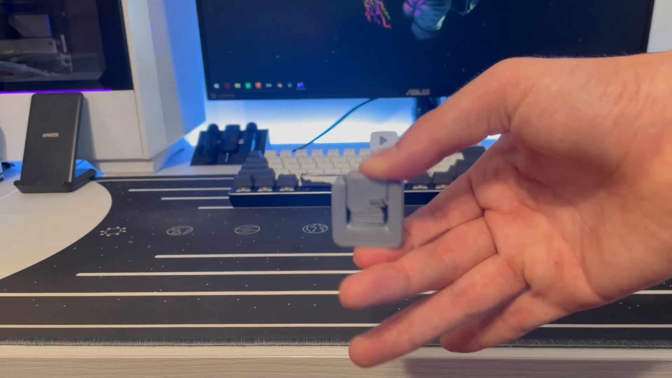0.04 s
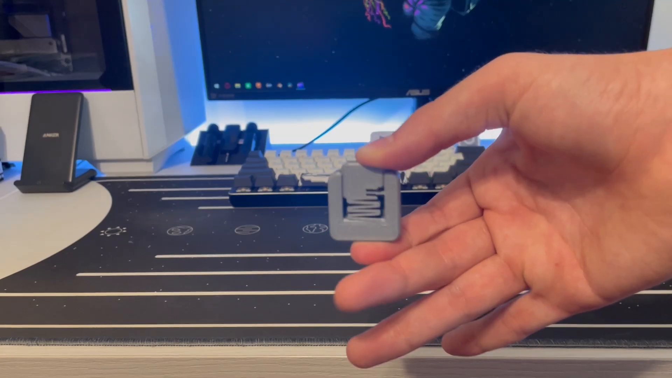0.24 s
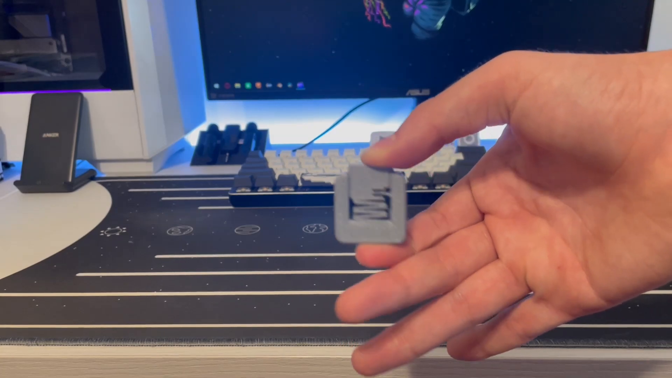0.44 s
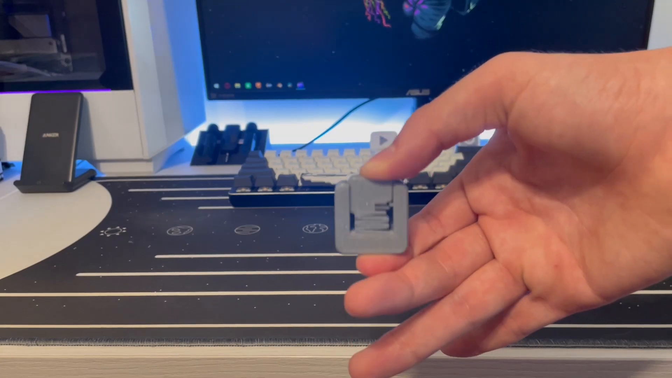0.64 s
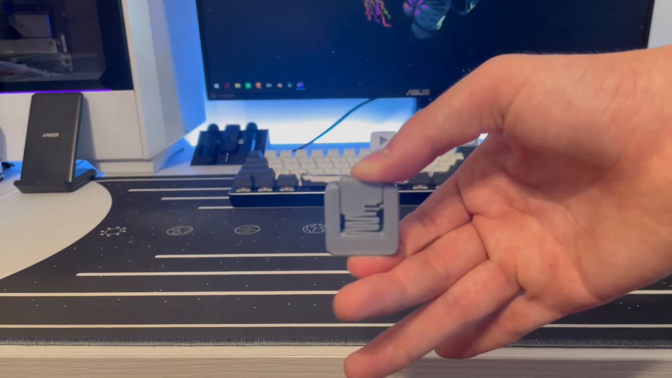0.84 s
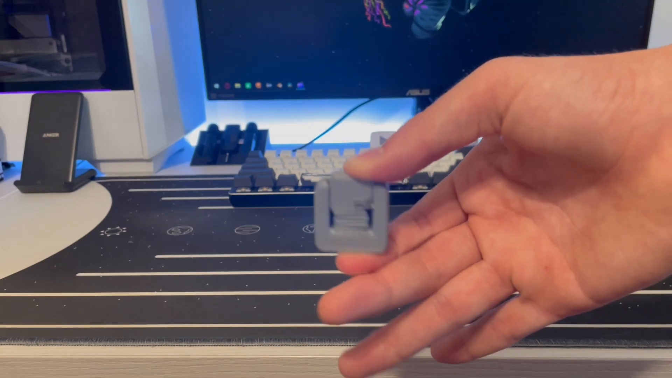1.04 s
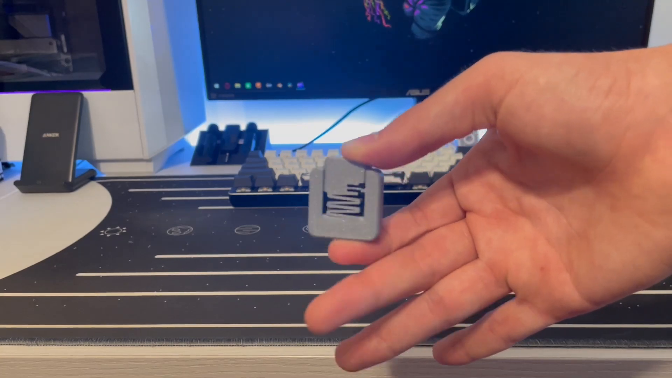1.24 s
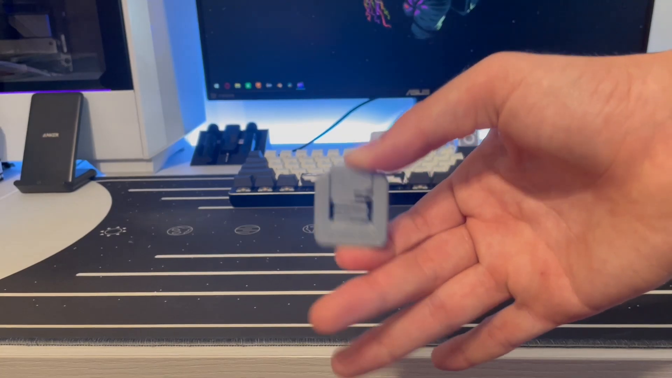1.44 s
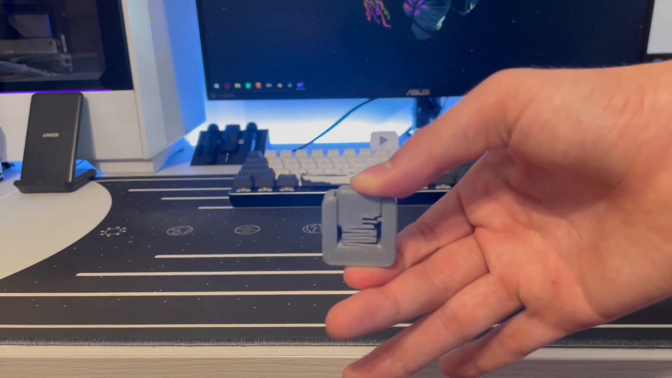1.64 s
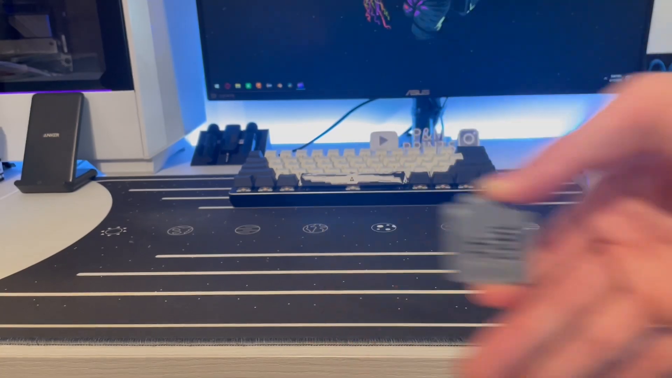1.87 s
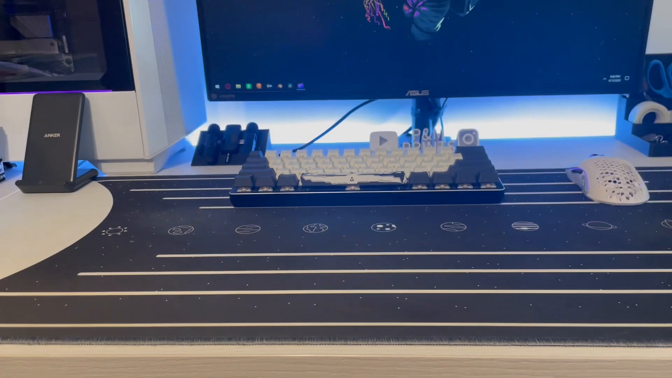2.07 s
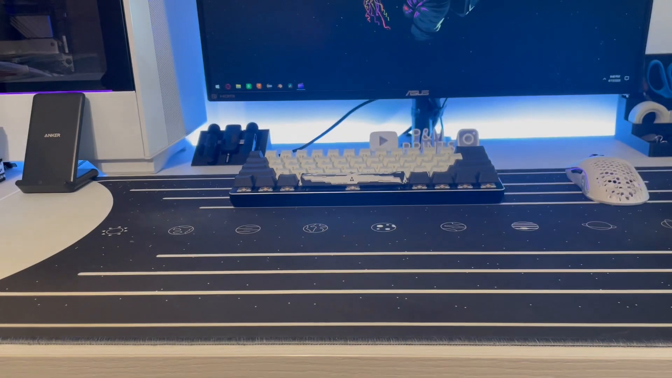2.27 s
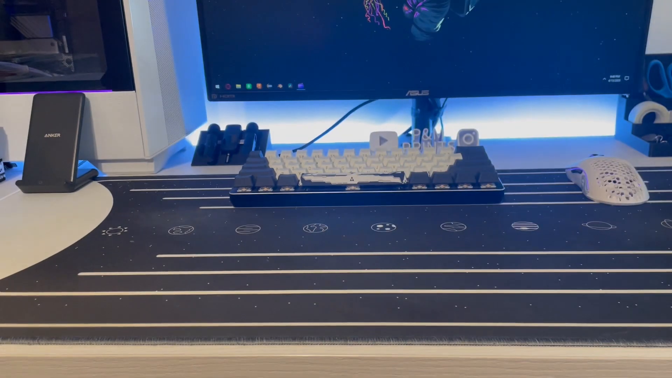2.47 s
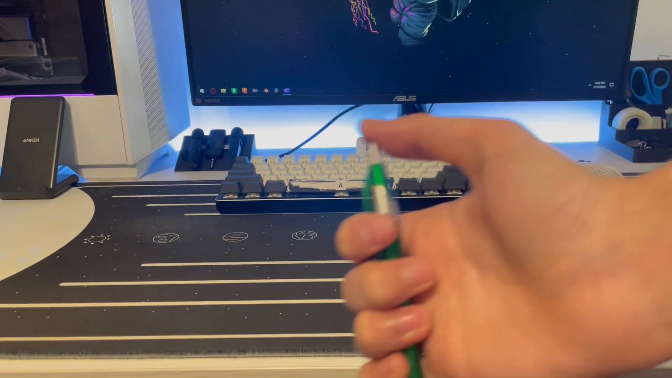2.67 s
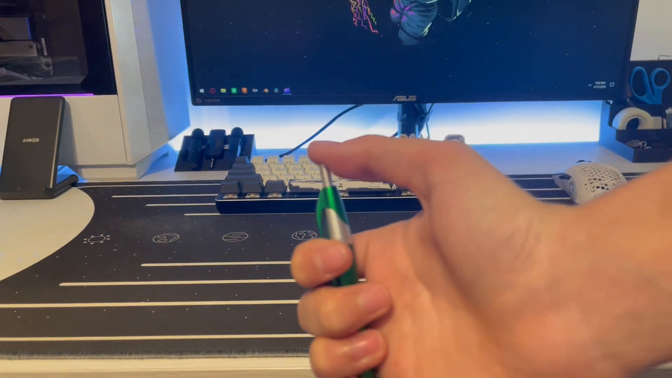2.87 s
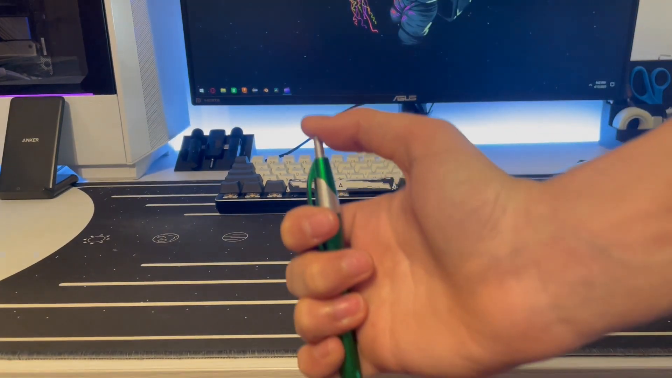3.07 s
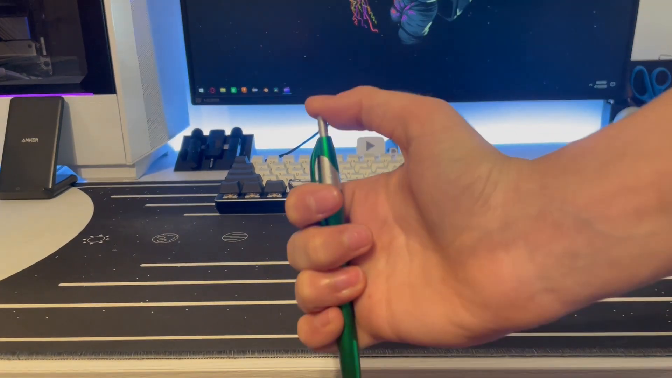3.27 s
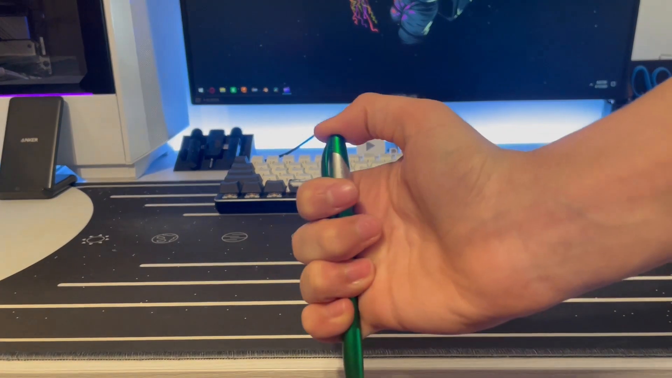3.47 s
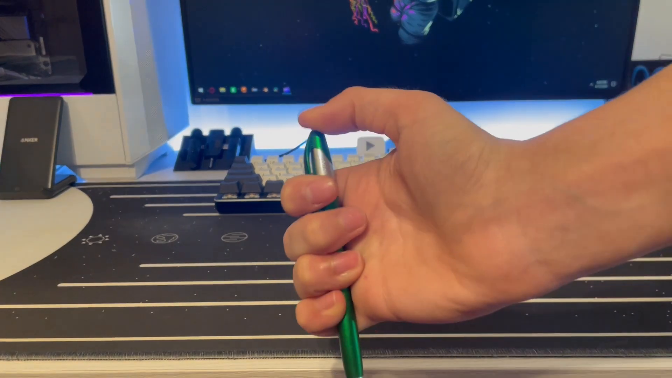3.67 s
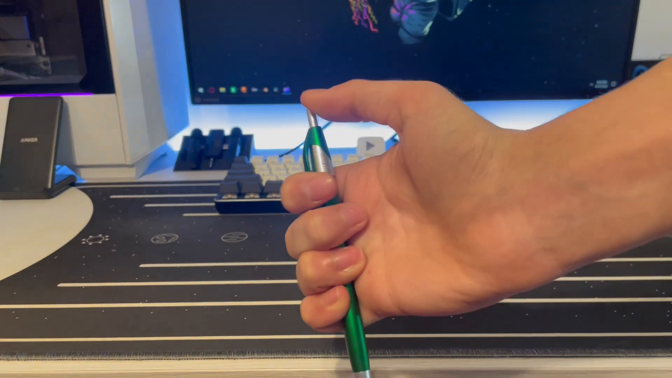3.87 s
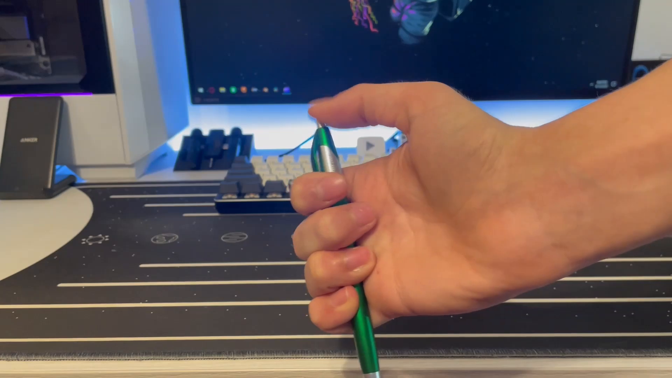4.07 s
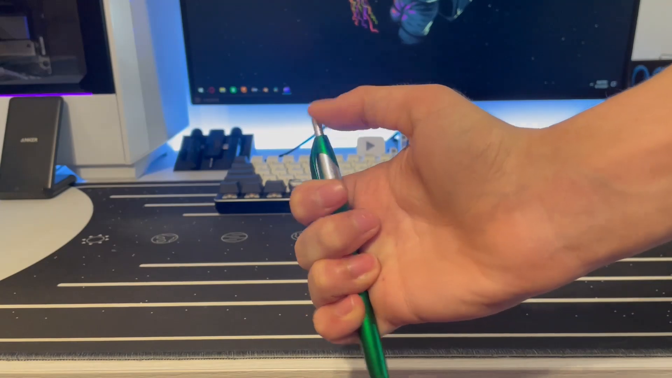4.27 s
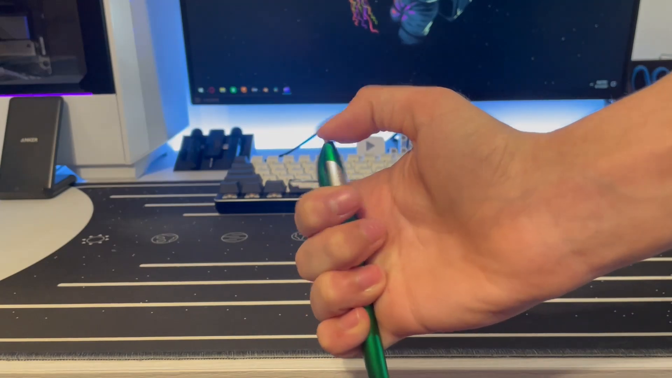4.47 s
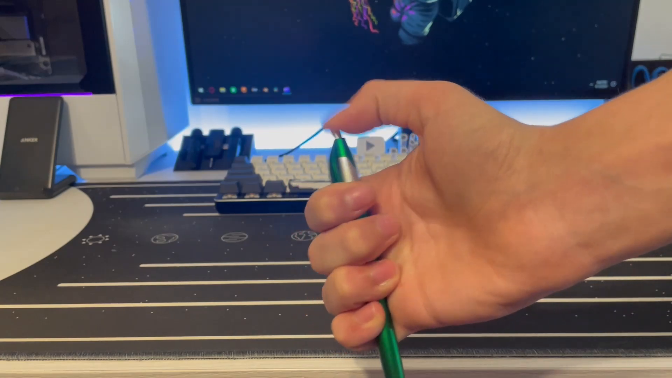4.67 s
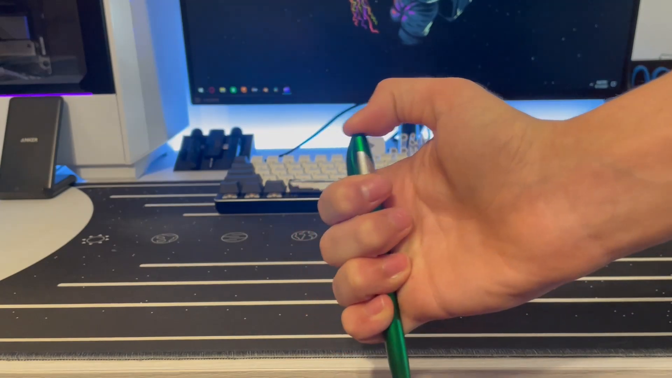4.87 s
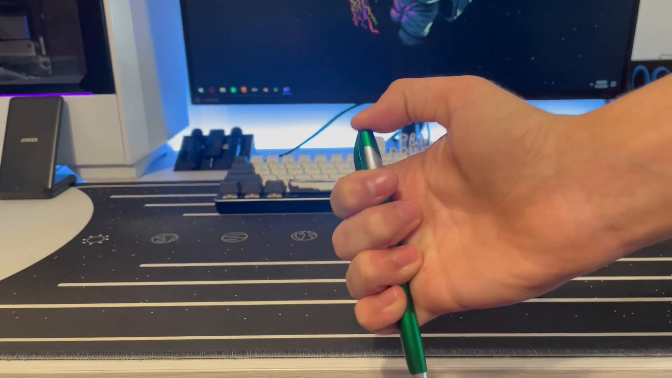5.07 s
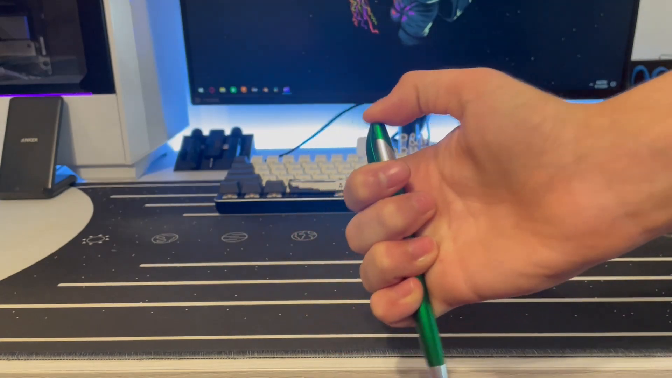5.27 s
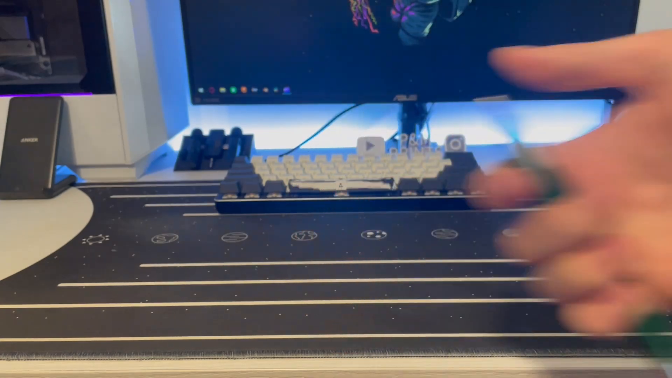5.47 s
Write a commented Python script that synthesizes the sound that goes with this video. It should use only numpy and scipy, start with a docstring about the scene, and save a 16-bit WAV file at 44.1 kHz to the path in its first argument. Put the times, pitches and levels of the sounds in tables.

```python
"""A plastic fidget clicker is pressed and released eleven times, then a retractable pen is clicked. Each snap
is a contact and a millisecond or two of chatter ringing a small plastic body; the pen's cam scrapes round on
every other press. The desk and a monitor's screen reflect the clicks, a small room lets them fade, and a low
rumble lies underneath."""
import sys
import numpy as np
from scipy import signal
from scipy.fft import rfft, irfft, next_fast_len
from scipy.io import wavfile
from scipy.ndimage import uniform_filter1d

SR = 44100
rng = np.random.default_rng(int(sys.argv[2]) if len(sys.argv) > 2 else 0)


def generate_wav(sig):
    """Save sig (samples, or channels by samples) to the path in sys.argv[1] as 16-bit PCM at SR."""
    pcm = np.round(np.clip(np.atleast_2d(sig).T, -1, 1) * 32767).astype(np.int16)
    wavfile.write(sys.argv[1], SR, pcm)


N = 242991
TIME = np.arange(N) / SR
SIZE = 2048  # samples in one struck sound
FREQS = np.fft.rfftfreq(SIZE, 1 / SR)
STROKE_TIME = TIME[:SIZE]
LEFT_RIGHT = np.array([[1], [-1]])

# Spectrum of the room rumble. Each row: frequency in Hz, relative density in dB.
RUMBLE_SPECTRUM = [(15, -45.5), (25, -23), (43, -10.5), (64, 6.5), (97, -19.5), (134, -12.5), (256, -17.5),
                   (293, -14.5), (405, -27), (489, -26), (545, -29), (1020, -39.5), (1400, -48.5),
                   (5140, -55.5), (16000, -62.5)]
# Stereo width of the rumble. Each row: frequency in Hz, side minus mid in dB.
RUMBLE_WIDTH = [(60, -18.0), (250, -12.5), (700, -0.5), (2000, -5.0)]
# Swells of the deepest rumble. Each row: centre in seconds, time to fall to 1/e in seconds, peak in dB.
DEEP_SWELLS = [(2.68, 0.071, -56), (3.08, 0.04, -60), (3.497, 0.068, -55), (3.867, 0.11, -63),
               (4.208, 0.1, -56), (4.905, 0.26, -64)]
DEEP_DB, RUMBLE_DB = -70, -63  # rms of the deep part at rest, and of the part above it
HUM_HZ, HUM_DB = 286, -76

# Decay of the room. Each row: band centre in Hz, T60 in seconds, relative level in dB, side minus mid in dB.
ROOM_BANDS = [(300, 0.1, 11, -6.5), (1200, 0.37, 7, -3), (3008, 0.28, 0, -9), (5200, 0.32, 2, -5),
              (8000, 0.33, -2, -28.5), (10700, 0.22, 2.5, -16), (14000, .34, -2, -17.5),
              (15500, .25, -10, -14.5)]
# First reflections from desk and screen. Each row: delay in seconds, level in dB.
REFLECTIONS = [(.0029, -17), (.0044, -22), (.0090, -22), (.0098, -20), (.0104, -23)]

# Broad response of the pen's body. Each row: frequency in Hz, relative level in dB.
PEN_BODY = [(40, -40), (200, -19), (450, -18), (800, -20), (1400, -13), (2000, -11), (2800, -7), (3800, -5),
            (5200, -3), (8500, -1), (10000, -5), (14000, -3), (16000, -5)]
# Resonances standing out of it. Each row: frequency in Hz, width in Hz, height in dB.
PEN_MODES = [(2880, 900, 15.7), (5510, 360, 3)]
# The button takes up its slack before a stroke. Each row: start in seconds, level in dB, brightness in dB.
PEN_TOUCHES = [(3.3975, -37.5, -2), (3.5634, -27.5, -13), (3.8293, -28, -15), (4.1037, -16.5, 2),
               (4.4808, -15, 11), (4.603, -21, -4), (4.9552, -23.5, -6), (5.1892, -18, 2),
               (5.3104, -20, -19)]
# The button goes down. Each row: start in seconds, level in dB, brightness in dB.
PEN_PRESSES = [(3.4244, -0.5, -2), (3.5939, 4, 3.5), (3.8693, 5, 14.5), (4.0538, 0, -7.5), (4.2514, 4, 7.5),
               (4.4371, 4, 1.5), (4.6294, 0.8, -4), (4.8166, 2, -1), (4.9803, -2, 1.5), (5.1423, 0.9, -11),
               (5.3336, 0.3, 4)]
# The spring throws the button back up. Each row: start in seconds, level in dB, brightness in dB.
PEN_RELEASES = [(3.7082, -4.5, 1.5), (3.9774, -2.5, 4), (4.1343, 2.5, 6.5), (4.339, 4, 9.5),
                (4.5103, -7, -2), (4.7132, 2, 8.5), (4.8605, -6, -1), (5.0414, 0, 6.5), (5.216, 3, 9.5)]
# How each kind of stroke colours the body. Each row: frequency in Hz, change in dB.
PEN_TOUCH_COLOUR = [(1000, -3), (2800, -12.5), (5800, -2.5), (8500, -7), (13500, -12)]
PEN_PRESS_COLOUR = [(1000, 3.5), (2000, 2), (2800, -5.5), (3450, 8.5), (4300, 9), (5800, 8), (8400, 15),
                    (13500, 13.5)]
PEN_RELEASE_COLOUR = [(400, -4), (1100, 5.5), (2000, 2.5), (2900, -4), (3900, -3), (5200, -2), (8500, 0.5),
                      (13000, -1), (15500, -8)]
# Brightness is a treble shelf. Each pair: where it starts in Hz, where it is full in Hz.
PEN_PRESS_SHELF_HZ = (5140, 12990)
PEN_RELEASE_SHELF_HZ = (3300, 4970)
# The cam slides off a tooth and seats.
# Each row: seating in seconds, slide length in seconds, slide level in dB, seat level in dB.
CAM_TURNS = [(3.8772, .005, -3, -4), (4.2572, .003, -6, -.5), (4.6363, .004, -4, -1),
             (4.9855, .003, -5, -5), (5.339, .003, -3, 1.5)]
# What the cam adds to the barrel's response. Each row: frequency in Hz, width in Hz, height in dB.
CAM_MODES = [(3883, 2400, 13.5), (6480, 1700, 4), (1680, 1100, -2), (10400, 2900, 9)]
# Some strokes of the pen's button also give a dull, low thud. Each row: start in seconds, level in dB.
PEN_THUDS = [(3.594, -26), (3.871, -24), (4.1343, -21), (4.254, -24), (4.339, -19), (4.632, -23),
             (5.337, -22)]
# Response of that thud. Each row: frequency in Hz, relative level in dB.
THUD_BODY = [(60, -20), (200, -5.5), (300, -6), (440, -0.5), (650, -4), (850, -3.5), (1300, -11),
             (4000, -30), (16000, -60)]
# The plunger rubs in the barrel before its first snap: start in seconds, stop in seconds, rms in dB.
PLUNGER_RUB = (3.348, 3.424, -70)
# The rubbing plunger sings a little. Each row: frequency in Hz, width in Hz, height in dB.
RUB_MODES = [(3800, 1400, 20)]

# Broad response of the clicker's body. Each row: frequency in Hz, relative level in dB.
CLICKER_BODY = [(40, -52), (150, -30), (400, -31), (1400, -39), (2000, -26), (2800, -22), (4100, -21),
                (5000, -11), (6300, -9), (7700, -1), (8400, -4), (9200, -13), (12700, -17), (15600, -15)]
# Resonances standing out of it. Each row: frequency in Hz, width in Hz, height in dB.
CLICKER_MODES = [(3460, 190, 3.5), (5106, 400, 2), (6670, 280, 3), (6908, 180, 3), (10920, 590, 2.5)]
# The clicker is pressed, and ticks twice as it is put away.
# Each row: start in seconds, level in dB, brightness in dB, leaf resonance height in dB.
CLICKER_PRESSES = [(.14, 8, 1, -3.5), (.2825, 9, 2, 6), (.4319, 8, 2.5, 10), (.5902, 7, -0.5, 1.5),
                   (.7514, 7, 0.5, -4.5), (.9025, 8, -2, 2.5), (1.0635, 8, -2.5, 5),
                   (1.2266, 5.5, -3, -6.5), (1.3778, 7.5, -0.5, 3), (1.5437, 8, -2.5, 1.5),
                   (1.736, 8, -1, 15.5), (1.9853, -30.5, -6, 13.5), (2.0715, -39, -6, 8)]
# It springs back; the grip shifts the case's main resonance.
# Each row: start in seconds, level in dB, brightness in dB, case resonance in Hz.
CLICKER_RELEASES = [(0.0124, 7.5, 2, 5730), (0.1765, 5, -3.5, 5130), (0.3396, 3.5, 0.5, 5670),
                    (.4947, 3.5, -2, 5400), (0.6482, 4.5, 0, 5360), (0.8088, 7.5, 0.5, 5260),
                    (0.971, 5, 2, 5660), (1.1365, 6.5, 2, 6050), (1.309, 7.5, 1.5, 5940),
                    (1.4453, 4.5, -2, 4970), (1.5865, 4.5, -3, 5800)]
# How each kind of stroke colours the body. Each row: frequency in Hz, change in dB.
CLICKER_PRESS_COLOUR = [(1000, 0), (3000, 0.5), (5000, 1.5), (5800, -0.5), (6500, -6), (8000, 6), (9300, 1),
                        (11000, 4.5), (13000, 2.5), (15500, 2.5)]
CLICKER_RELEASE_COLOUR = [(1000, -1), (2700, 2.5), (3700, 2), (4600, 0), (5500, -2.5), (6500, -1),
                          (7400, -1), (8800, 6.5), (12500, -2), (14000, 7.5), (15500, -2)]
# Brightness is a treble shelf: where it starts in Hz, where it is full in Hz.
CLICKER_SHELF_HZ = (8000, 11000)
# The last press and the faint ticks after it also ping near 6.4 kHz. Each row: start in seconds, level in dB.
LEAF_PINGS = [(1.7362, 2.5), (1.9715, -42), (1.987, -26.5), (2.0714, -32.5)]
LEAF_HZ, LEAF_T60_S = 6410, 0.0095
LEAF_RING_HZ, LEAF_WIDTH_HZ = 6600, 360  # the leaf during a press
CASE_HZ, CASE_WIDTH_HZ, CASE_DB = 5735, 380, 13  # the case with the thumb pressing on it
RELEASE_WIDTH_HZ, RELEASE_DB = 1000, 11  # the case's broader resonance with the thumb lifting

# The hand is nearer the left microphone port. Each row: frequency in Hz, left minus right in dB.
HAND_BALANCE = [(300, 2), (1500, 2.5), (2500, 4), (4700, 6), (6200, 3), (7600, 0), (16000, 0)]
# Phase between the two ports. Each row: frequency in Hz, lead of the left in radians.
PORT_PHASE = [(0, 0), (1500, .2), (2800, .8), (5300, .9), (6200, -.1), (8200, -3.14), (14800, -9.42),
              (17000, -9.6)]
TOP_HZ = 16500


def undb(db):
    """Definition of the decibel: amplitude gain is ten to the power of a twentieth of the level."""
    return 10 ** (np.asarray(db) / 20)


def along(freqs, points, column=1):
    """Logarithmic interpolation: a table is read with straight lines on a log frequency axis."""
    rows = np.array(points, float)
    return np.interp(np.log(freqs + 1), np.log(rows[:, 0]), rows[:, column])


def unit(x):
    """Normalisation: the sum of squares becomes one."""
    return x / np.sqrt(np.sum(x ** 2))


def add(track, start_s, sound):
    """Superposition: a sound is summed into the track at its start."""
    start = max(int(start_s * SR), 0)
    track[start:start + len(sound)] += sound[:max(N - start, 0)]


def rumble():
    """Shaped noise: low room noise whose deepest part swells and is nearly mono, with a faint hum."""
    freqs = np.fft.rfftfreq(N, 1 / SR)
    mid, side = rfft(rng.standard_normal((2, N))) * undb(along(freqs, RUMBLE_SPECTRUM))
    spectrum = mid + undb(along(freqs, RUMBLE_WIDTH)) * side * LEFT_RIGHT
    deep_share = 1 / (1 + (freqs / 95) ** 8)  # crossover at 95 Hz
    deep = irfft(spectrum * deep_share, N)
    upper = irfft(spectrum * (1 - deep_share), N)

    swells = sum(undb(db) * np.exp(-((TIME - centre) / fall_s) ** 2) for centre, fall_s, db in DEEP_SWELLS)
    deep = deep / deep.std() * (undb(DEEP_DB) + swells)
    upper = upper / upper.std() * undb(RUMBLE_DB)
    hum = undb(HUM_DB) * np.sin(2 * np.pi * HUM_HZ * TIME)
    return deep + upper + hum


def room(x, tail_db, scatter_db, scatter_s):
    """Reverberation: near surfaces reflect, desk clutter scatters, and walls give a short diffuse tail."""
    t = TIME[:SR * 3 // 4]
    freqs = np.fft.rfftfreq(len(t), 1 / SR)
    log_centres = np.log([row[0] for row in ROOM_BANDS])
    scatter = unit((t > .002) * np.exp(-t / scatter_s))
    response = np.zeros((2, len(t)))
    for share, (_, t60, db, side_db) in zip(np.eye(len(ROOM_BANDS)), ROOM_BANDS):
        # overlapping bands whose powers sum to one
        band = np.sqrt(np.interp(np.log(freqs + 1), log_centres, share))
        mid, side = irfft(rfft(rng.standard_normal((2, len(t)))) * band, len(t))
        field = (mid + undb(side_db) * side * LEFT_RIGHT) / np.sqrt(1 + undb(side_db) ** 2)
        tail = unit((1 - np.exp(-t / 0.0033)) * np.exp(-np.log(1000) * t / t60))
        response += undb(db) * field * (undb(tail_db) * tail + undb(scatter_db) * scatter)
    for delay, db in REFLECTIONS:
        response[:, int(delay * SR)] += undb(db)
    return signal.fftconvolve(x[None], response, axes=1)[:, :N]


def body_db(body, modes):
    """Resonance: a body's response is a broad shape with peaks on top, summed in dB."""
    peaks_db = sum(db / (1 + (2 * (FREQS - hz) / width) ** 2) for hz, width, db in modes)
    return along(FREQS, body) + peaks_db


def ring(force, response_db):
    """Minimum phase: folding the cepstrum makes a causal filter, through which the force is sent."""
    cepstrum = irfft(np.log(undb(response_db)))
    cepstrum[1:SIZE // 2] *= 2
    cepstrum[SIZE // 2 + 1:] = 0
    sound = irfft(rfft(force) * np.exp(rfft(cepstrum)))
    return unit(sound * np.hanning(2 * SIZE)[SIZE:])  # the falling half fades the end


def chatter(envelope, response_db, contact):
    """Repeated impact: a first contact and a run of tiny random ones ring the body."""
    force = unit(envelope * rng.standard_normal(SIZE))
    force[0] += contact
    # evening out the force's broad spectrum leaves the colour to the body
    uneven_db = 10 * np.log10(uniform_filter1d(np.abs(rfft(force)) ** 2, size=35))
    return ring(force, response_db - uneven_db)


def shelf(edges_hz):
    """Treble shelf: the share of a stroke's brightness that each frequency gets."""
    return along(FREQS, [(edges_hz[0], 0), (edges_hz[1], 1)])


def snap(response_db, contact, rise_s, fall_s):
    """Snap-through impact: a contact and a brief chatter, rising and dying, against the body."""
    rise = (1 - np.exp(-STROKE_TIME / rise_s)) ** 2
    return chatter(rise * np.exp(-STROKE_TIME / fall_s), response_db, contact)


def pen_button(strokes, colour, shelf_hz):
    """Hard contact: dry, sharp snaps of the pen's button; strokes of one kind share their colour."""
    track = np.zeros(N)
    response_db = body_db(PEN_BODY, PEN_MODES) + along(FREQS, colour)
    for start, db, bright_db in strokes:
        sound = snap(response_db + bright_db * shelf(shelf_hz), contact=.7, rise_s=.0002, fall_s=.0003)
        add(track, start, undb(db) * sound)
    return track


def pen_cam():
    """Sliding friction, then impact: the cam scrapes with growing strength and seats."""
    track = np.zeros(N)
    cam_db = body_db(PEN_BODY, CAM_MODES)
    t = STROKE_TIME
    for seating, length, slide_db, seat_db in CAM_TURNS:
        slide = chatter((t < length) * (0.82 + t / length), cam_db, contact=0)
        seat = chatter(np.exp(-t / 0.0017), cam_db, contact=0.073)
        add(track, seating - length, undb(slide_db) * slide)
        add(track, seating, undb(seat_db) * seat)
    return track


def pen_thuds():
    """Impulse response: some strokes of the pen's button also give a dull, low thud."""
    track = np.zeros(N)
    thud = ring(signal.unit_impulse(SIZE), along(FREQS, THUD_BODY))
    for start, db in PEN_THUDS:
        add(track, start, undb(db) * thud)
    return track


def plunger_rub():
    """Friction noise: peaky random force makes the plunger sing a little in the barrel."""
    start, stop, rub_db = PLUNGER_RUB
    friction = rng.laplace(size=N) * np.sqrt(.5)  # unit variance
    friction = friction * (TIME > start) * (TIME < stop)
    barrel = ring(signal.unit_impulse(SIZE), body_db(PEN_BODY, RUB_MODES))
    return undb(rub_db) * signal.fftconvolve(friction, barrel)[:N]


def pen():
    """Superposition of impacts and friction: button touches, presses and releases, cam, thuds and rub."""
    touches = pen_button(PEN_TOUCHES, PEN_TOUCH_COLOUR, PEN_PRESS_SHELF_HZ)
    presses = pen_button(PEN_PRESSES, PEN_PRESS_COLOUR, PEN_PRESS_SHELF_HZ)
    releases = pen_button(PEN_RELEASES, PEN_RELEASE_COLOUR, PEN_RELEASE_SHELF_HZ)
    return touches + presses + releases + pen_cam() + pen_thuds() + plunger_rub()


def clicker_stroke(colour, bright_db, modes):
    """Damped resonance: one snap, coloured by its direction and the modes that the grip leaves free."""
    response_db = body_db(CLICKER_BODY, CLICKER_MODES + modes) + along(FREQS, colour)
    response_db = response_db + bright_db * shelf(CLICKER_SHELF_HZ)
    return snap(response_db, contact=0.17, rise_s=.0009, fall_s=0.00061)


def leaf_ping():
    """Damped vibration: the leaf is a sine that builds quickly and decays exponentially."""
    t = STROKE_TIME
    decay = np.exp(-np.log(1000) * t / LEAF_T60_S)
    return unit(np.sin(2 * np.pi * LEAF_HZ * t) * (1 - np.exp(-t / 0.00032)) * decay)


def clicker():
    """Snap-through buckling: a stiff plastic leaf snaps over and buzzes against its case for about 2 ms."""
    track = np.zeros(N)
    for start, db, bright_db, leaf_db in CLICKER_PRESSES:
        modes = [(CASE_HZ, CASE_WIDTH_HZ, CASE_DB), (LEAF_RING_HZ, LEAF_WIDTH_HZ, leaf_db)]
        add(track, start, undb(db) * clicker_stroke(CLICKER_PRESS_COLOUR, bright_db, modes))
    for start, db, bright_db, case_hz in CLICKER_RELEASES:
        modes = [(case_hz, RELEASE_WIDTH_HZ, RELEASE_DB)]
        add(track, start, undb(db) * clicker_stroke(CLICKER_RELEASE_COLOUR, bright_db, modes))
    ping = leaf_ping()
    for start, db in LEAF_PINGS:
        add(track, start, undb(db) * ping)
    return track


def scene():
    """Interaural level difference: both toys sound a little left of centre, in the room."""
    clicks = clicker() + pen()
    balance = undb(along(np.fft.rfftfreq(N, 1 / SR), HAND_BALANCE) * LEFT_RIGHT / 2)
    balance = balance / np.sqrt(np.mean(balance ** 2, axis=0))  # mean power of the two sides is kept
    direct = irfft(rfft(clicks) * balance, N)
    return direct + room(clicks, tail_db=-13.5, scatter_db=-16, scatter_s=0.0028) + rumble()


def record(dry):
    """Phase difference: the phone's two microphone ports differ through the treble; the top is cut."""
    size = next_fast_len(N + SIZE)
    lead = np.interp(np.fft.rfftfreq(size, 1 / SR), *np.transpose(PORT_PHASE))
    turn = np.exp(1j * lead * LEFT_RIGHT / 2)
    ports = irfft(rfft(dry, size) * turn, size)[:, :N]
    top_cut = signal.ellip(8, .2, 70, TOP_HZ, fs=SR, output="sos")
    return signal.sosfilt(top_cut, ports)


dry = scene()
out = record(dry)
generate_wav(out)
```